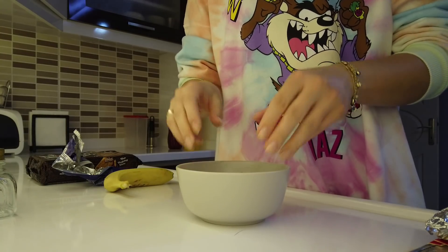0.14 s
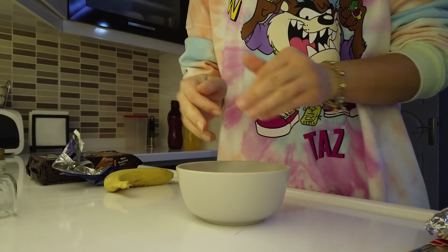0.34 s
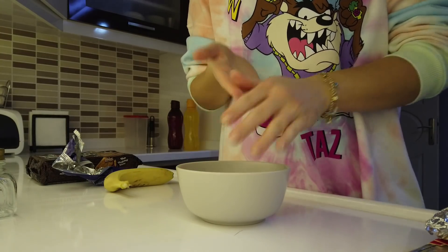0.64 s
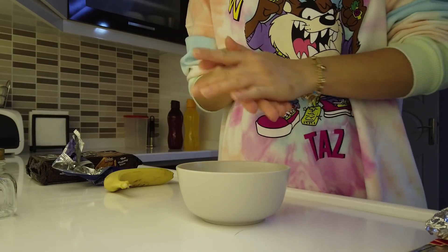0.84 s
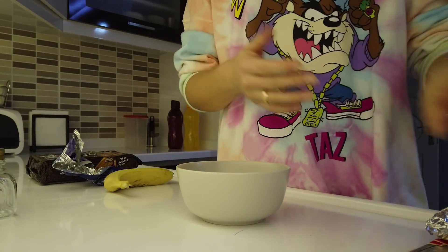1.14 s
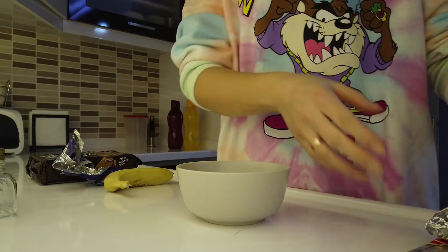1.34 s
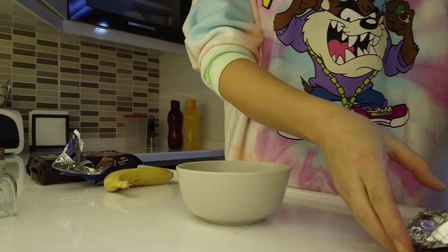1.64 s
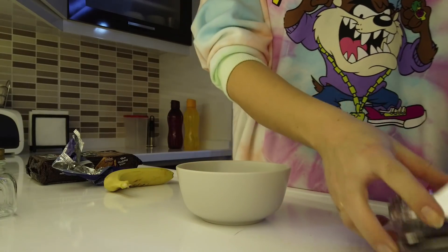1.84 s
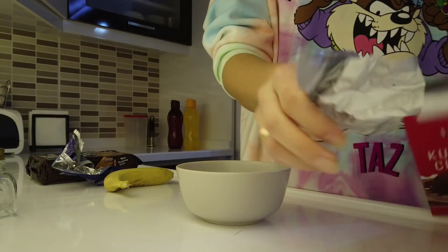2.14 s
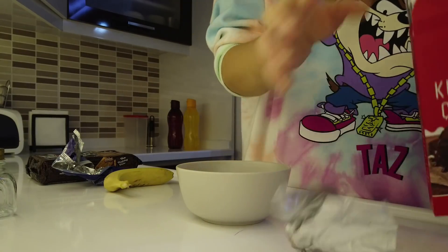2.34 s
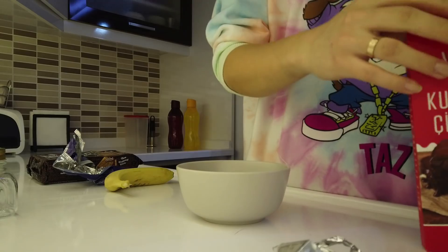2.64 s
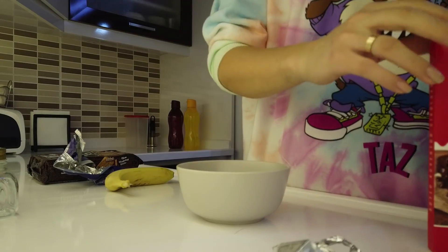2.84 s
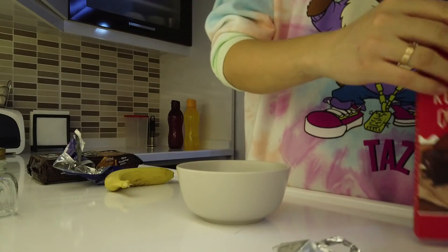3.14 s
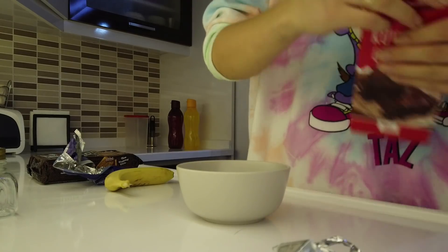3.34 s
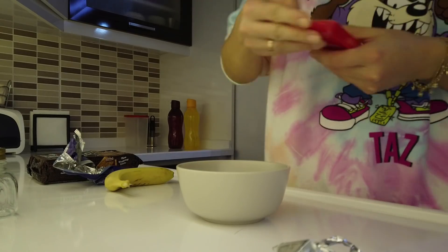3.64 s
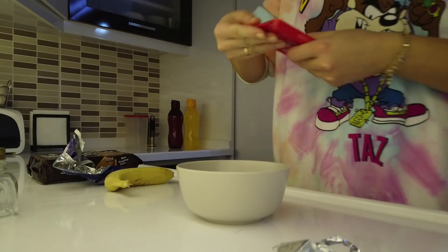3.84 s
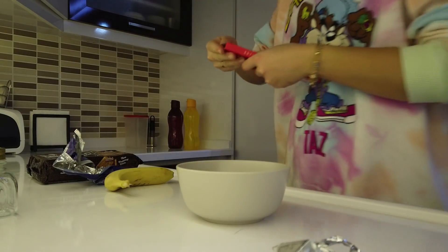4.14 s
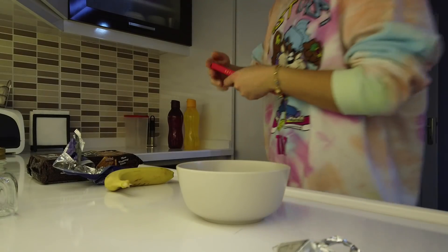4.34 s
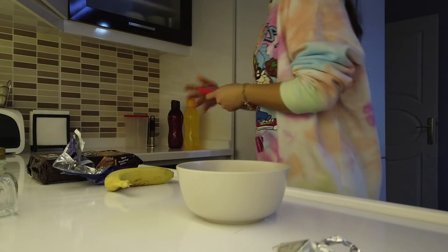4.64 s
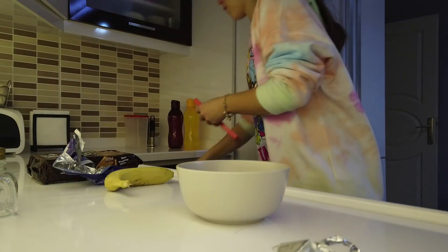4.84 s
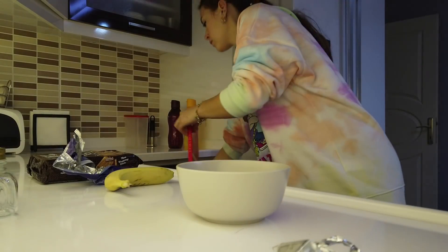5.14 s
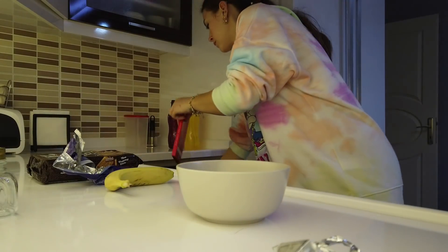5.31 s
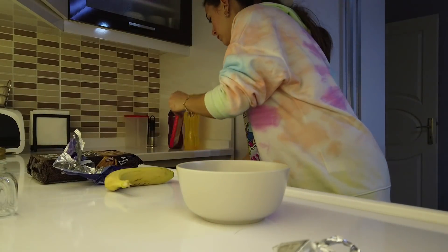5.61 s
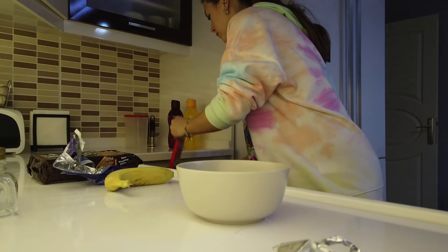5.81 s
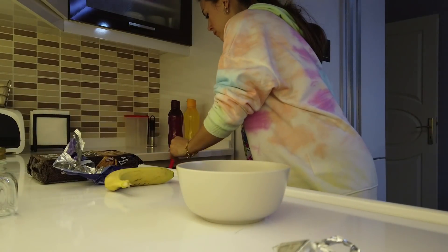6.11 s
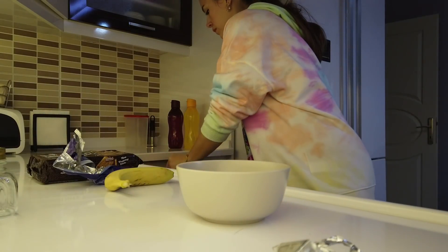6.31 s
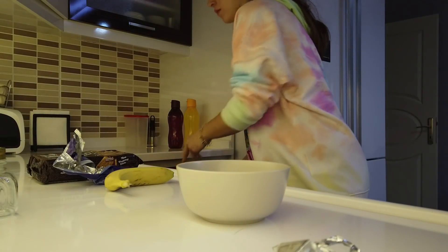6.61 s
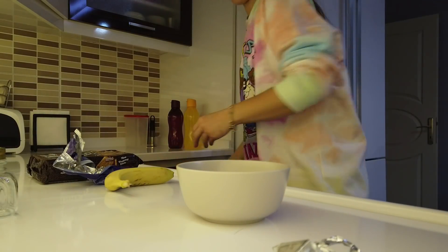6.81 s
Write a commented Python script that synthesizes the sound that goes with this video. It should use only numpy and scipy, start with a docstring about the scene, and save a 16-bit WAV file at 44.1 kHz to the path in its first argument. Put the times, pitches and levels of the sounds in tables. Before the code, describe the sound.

A small, quiet kitchen heard closely in stereo, with a faint wavering fridge hum, narrow hiss and short room echo throughout. At 0.13-0.3 s several chocolate pieces knock and clatter into a ceramic bowl, with hollow ringing and tiny bright clicks. Soft palm brushes follow, barely audible at 0.4, clearer at 0.7 and 1.0. Fingers tap the counter at 1.4; foil crackles crisply until about 2.2, with a tiny skin squeak at 1.6. Another sharp foil burst comes at 2.4-2.8, ending as a box knocks firmly on the counter at 2.8. From 3.0 to 4.8 the carton flexes and creases in small, dry pops. A drawer starts rolling around 5.1-5.4, rumbling with bumps at 5.8-5.9. A low drone glides at 6.0-6.2, then heavy wooden-sounding bumps at 6.5 and 6.7 close it, with rattling rollers and rustling packets.

```python
"""Pieces of chocolate drop into a ceramic bowl: knocks, clatter and ringing tones. Palms hiss past each other.
Foil is gathered up with ticks, snaps and squeaks; a box is stood on the counter and its carton folded shut.
A drawer then rolls open on noisy rollers, drones as it glides, and bumps closed on rustling packets.
All along a fridge hums and hisses in the small room, whose echo follows the other sounds."""
import sys
import numpy as np
from scipy import signal
from scipy.fft import rfft, irfft, next_fast_len
from scipy.io import wavfile
from scipy.ndimage import uniform_filter1d

SR = 44100
rng = np.random.default_rng(int(sys.argv[2]) if len(sys.argv) > 2 else 0)


def output_pcm(signal):
    """Save a mono or channel-first signal as 16-bit PCM at the path in sys.argv[1].

    Samples are clipped to [-1, 1] before scaling.
    """
    pcm = np.clip(np.atleast_2d(signal).T, -1, 1) * 32767
    wavfile.write(sys.argv[1], SR, np.round(pcm).astype(np.int16))


N = 307377
TIME = np.arange(N) / SR  # seconds

# Levels in the tables are relative: the functions may trim them further.
# Fridge and room air: colour of the noise [f/Hz, level/dB]
AIR_COLOUR = [(20, -7), (36, -2.5), (48, 13), (64, -21), (82, -12), (130, -2.5), (165, -7.5), (260, -13),
              (370, -2.5), (500, -18), (630, -10), (800, -19), (2200, -17), (2900, -16.5), (3800, -17.5),
              (7000, -31), (10500, -28), (16000, -53)]
AIR_DB = -56
# Steady tones of the fridge [f/Hz, level/dB]
FRIDGE_HUM = [(48.4, -64), (134.6, -64.5), (188.4, -60), (296.1, -81.5), (376.8, -69), (597.5, -72.5)]
# Narrow hiss of the fridge: colour [f/Hz, level/dB]
HISS_COLOUR = [(2300, -39), (2700, 5.5), (2880, 12.5), (3100, 8.5), (3700, -24)]
HISS_DB = -61.5
# How long the room's echo takes to fall 60 dB [f/Hz, fall time/s]
ROOM_FALL = [(100, 0.77), (260, 0.68), (700, 0.6), (2000, 0.47), (7000, 0.37), (14000, 0.31)]
# How much spread-out sound differs between left and right [f/Hz, side level/dB]
STEREO_WIDTH = [(60, -22.5), (130, -45), (250, -34.5), (600, -25), (1300, -20), (2600, -14.5), (5000, -7),
                (14000, -4)]

# Drawer starting, reaching its stop and closing [t/s, knock level/dB, knock f/Hz, body level/dB]
DRAWER_KNOCKS = [(5.364, -27, 350, -41), (5.815, -18, 73, -33.5), (5.893, -23, 116, -40.5),
                 (6.4985, -10, 219, -21), (6.5075, -10.5, 211, -18), (6.530, -14.5, 111, -27),
                 (6.577, -44, 201, -31.5), (6.676, -12, 400, -32), (6.690, -13, 200, -21.5),
                 (6.706, -17, 295, -30), (6.745, -29, 336, -32.5)]
# Tones the drawer rings with [f/Hz, level/dB, time to fall 60 dB/s]
DRAWER_TONES = [(95.6, -7.5, 0.73), (130.5, -1, 0.49), (190, 8.5, 0.83), (219.5, 1, 0.33), (372, -2, 0.18),
                (401.4, 3, 0.26), (460, 7, 0.12), (1129, -2, 0.22)]
# Colour of the drawer's many short, crowded tones [f/Hz, level/dB]
DRAWER_CLATTER_COLOUR = [(30, -35.5), (100, 10.5), (400, 7.5), (700, -1.5), (1300, -9.5), (2400, -9.5),
                         (4500, -25), (10000, -54), (16000, -46)]
# Pushes of the drawer [start t/s, held t/s, panel rumble level/dB, roller noise level/dB]
DRAWER_PUSHES = [(5.10, 0.045, -50.5, -60.5), (5.36, 0.25, -43, -45), (5.63, 0.21, -44.5, -41.5),
                 (5.88, 0.093, -47.5, -53.5), (6.0, 0.2, -54.5, -66.5), (6.52, 0.21, -38, -32.5),
                 (6.80, .13, -40.5, -50.5)]
# Colour of the shaking panels [f/Hz, level/dB]
RUMBLE_COLOUR = [(30, -4), (60, -3), (110, 14.5), (170, 1), (260, 5), (400, 3), (550, -6), (900, -20),
                 (2000, -56.5)]
# Colour of the rollers [f/Hz, level/dB]
ROLLER_COLOUR = [(300, -24.5), (650, 8.5), (1050, 4.5), (1400, 0), (2300, -9.5), (4000, -22.5),
                 (8000, -46.5)]
# Drawer front droning as it glides [start t/s, held t/s, level/dB]
DRONE_GLIDE = [(6.01, 0.15, -37.5)]
# Tones in the drone [multiple of its pitch, level/dB]
DRONE_TONES = [(1, 1), (1.64, -15)]
DRONE_HZ, DRONE_SAG_HZ_PER_S = 220, 13  # it sinks as the drawer slows

# Fingers, then the box, meeting the counter [t/s, knock level/dB, knock f/Hz, body level/dB]
COUNTER_KNOCKS = [(1.4183, -25.5, 401, -37), (1.527, -31, 172.6, -53), (2.8152, -10.5, 409, -10),
                  (2.8345, -18, 270, -21), (2.8580, -20, 503, -26), (4.016, -38, 405, -48),
                  (4.436, -35, 358, -44)]
# Tones the counter rings with [f/Hz, level/dB, time to fall 60 dB/s]
COUNTER_TONES = [(90.5, 0.5, 0.15), (131, 1.5, 0.3), (147, -2.5, 0.1), (182.5, -9, 0.53), (215, -16, 0.26),
                 (270, -9, 0.089), (310, -11, 0.19), (352.4, -2.5, 0.48), (460, 5, 0.23), (491, -11, 0.43),
                 (608, -4, 0.14), (730, -17, 0.14), (827, -8, 0.13)]
# Colour of the counter's many short, crowded tones [f/Hz, level/dB]
COUNTER_CLATTER_COLOUR = [(30, -34), (120, 2), (280, 3), (500, 1.5), (800, -4.5), (1300, -16), (2500, -21),
                          (5000, -32), (10000, -56), (16000, -45)]
# Hand and box dragging over the counter [start t/s, held t/s, level/dB]
COUNTER_DRAGS = [(1.54, 0.2, -38), (2.60, .17, -42.5)]
# Colour of the dragging [f/Hz, level/dB]
DRAG_NOISE_COLOUR = [(40, -33), (90, 2.5), (170, -2.5), (300, -11), (600, -19.5), (1200, -22.5)]

# Packets shifting in the drawer [start t/s, held t/s, flexing level/dB, fine crease level/dB]
PACKET_SHIFTS = [(5.69, .03, -60, -67), (5.795, 0.022, -58, -59), (6.498, 0.061, -43.5, -43),
                 (6.615, 0.088, -40.5, -41), (6.805, 0.034, -50, -52.5)]
# Folds of the carton [start t/s, held t/s, card flexing level/dB, fine crease level/dB]
CARTON_FOLDS = [(3.06, 0.012, -48.5, -52.5), (3.14, 0.087, -46.5, -49), (3.35, 0.12, -57.5, -64.5),
                (3.45, 0.04, -57.5, -55.5), (3.585, .12, -51, -56.5), (3.77, 0.12, -55.5, -59),
                (3.975, 0.028, -38, -50), (4.11, 0.15, -51, -67.5), (4.335, 0.1, -48, -54),
                (4.55, 0.028, -57, -63), (4.76, .08, -80, -66.5)]
# Squeezes of the foil [start t/s, held t/s, sheet flexing level/dB, fine crease level/dB]
FOIL_SQUEEZES = [(1.416, .03, -39.5, -54), (1.562, 0.21, -38, -34), (1.605, 0.012, -30, -71),
                 (1.825, 0.25, -36, -38), (1.975, 0.27, -37.5, -31.5), (2.43, 0.0086, -58, -31.5),
                 (2.55, 0.28, -32.5, -34)]
# Colour of flexing card [f/Hz, level/dB]
CARD_FLEX_COLOUR = [(200, 8), (800, -9), (1100, -6.5), (1500, 0.5), (2000, -4.5), (2700, 0), (4000, -7.5),
                    (6000, -17), (9000, -43)]
# Colour of flexing foil [f/Hz, level/dB]
FOIL_FLEX_COLOUR = [(100, -2), (500, -4), (800, -7), (1200, 3), (1600, -4.5), (2600, 1.5), (4200, -6.5),
                    (6000, -21), (9000, -46)]
# Colour of the fine creases [f/Hz, level/dB]
CREASE_COLOUR = [(2500, -6.5), (5000, 2.5), (7000, 0), (8800, 3.5), (9500, 3.5), (10500, 6), (11500, -2.5),
                 (13500, -4.5), (16000, -11)]
# Loudest buckles of foil and card [t/s, snap level/dB, f/Hz, crackle level/dB]
LOUD_SNAPS = [(1.4175, -23, 1190, -29), (1.5640, -31, 3150, -31), (1.8230, -29, 2250, -24),
              (1.9640, -15, 2640, -27), (2.0350, -19.5, 3730, -46), (2.196, -28, 1400, -49),
              (2.427, -68, 2000, -18.5), (2.4366, -16, 3850, -26.5), (2.799, -16.5, 2060, -18.5),
              (2.817, -14, 2400, -13.5), (3.147, -34, 2260, -39), (3.159, -24.5, 2400, -40),
              (3.6419, -27, 1750, -48), (3.665, -30, 2150, -57), (3.702, -33.5, 1730, -59),
              (3.9826, -43, 3000, -51), (3.9950, -25, 3000, -45), (4.013, -27, 1760, -28),
              (4.0780, -29, 2480, -50), (4.3457, -29.5, 1580, -28), (4.4346, -23, 1520, -38),
              (6.6270, -30, 1670, -20), (6.7010, -15.5, 1820, -31)]
# Colour of the crackle around a snap [f/Hz, level/dB]
CRACKLE_COLOUR = [(500, -31), (1200, 8), (3000, 6), (6000, -1), (10500, 0), (12000, -8.5), (16000, -8.5)]
SNAP_CYCLES = 22.6  # a snapping facet falls 60 dB in this many cycles
# Fingertips squeaking under the foil [middle t/s, half length t/s, start f/Hz, end f/Hz, level/dB]
FINGER_SQUEAKS = [(1.616, 0.0038, 942, 1214, -18), (1.632, 0.0036, 1800, 2010, -22.5)]
# One palm sweeping over the other [middle t/s, level/dB]
PALM_SWEEPS = [(.41, -65.5), (.70, -47), (1.001, -44)]
# Colour of the palms [f/Hz, level/dB]
PALM_COLOUR = [(500, 0.5), (1500, -15.5), (3500, 0.5), (6000, -2), (10000, 5), (12000, 4), (16000, -1.5)]
BRUSH_HALF_S = 0.056  # from the middle of a sweep until it has fallen to 1/e

# Chocolate landing in the bowl [t/s, knock level/dB, knock f/Hz, body level/dB]
BOWL_KNOCKS = [(.1335, -19, 920, -30), (.1862, -15.5, 1300, -22.5), (.2297, -9.5, 1150, -18),
               (.2440, -27, 169.4, -31), (.2850, -10, 1010, -26.5), (.2940, -13.5, 1030, -40)]
# Tones the bowl rings with [f/Hz, level/dB, time to fall 60 dB/s]
BOWL_TONES = [(166.5, -4.5, 0.63), (437, -5.5, 0.55), (726, -6.5, 0.82), (884, -1, 0.16), (1010, -22, .3),
              (1132, -5.5, 0.4), (1378, -1, 0.12), (1570, -7, 0.077), (2598, -1.5, 0.45),
              (6820, -22.5, .27), (9800, -26, 0.22)]
# Colour of the bowl's many short, crowded tones [f/Hz, level/dB]
BOWL_CLATTER_COLOUR = [(40, -13), (100, -1), (300, -3.5), (520, -7.5), (1100, -1), (1700, -9),
                       (2400, -19.5), (3400, -39), (4700, -43), (8000, -53), (16000, -54)]
# Hard edges of chocolate clicking on the glaze [t/s, level/dB]
EDGE_CLICKS = [(0.1847, -48), (0.21, -48), (0.229, -36), (.2660, -64), (0.284, -51)]
# Colour of those clicks [f/Hz, level/dB]
GLAZE_COLOUR = [(1500, 2), (2400, -8), (3400, 5), (4700, 10), (5800, -8), (7000, 2), (8200, -8),
                (9500, -18), (16000, -30)]
# The small pieces' own ring [f/Hz, level/dB, time to fall 60 dB/s]
PIECE_TONES = [(4560, -10, .12), (4790, -9, .1), (5050, -13, .09), (8230, -18, .16)]

CLATTER_BUILD_S = 0.0033  # a blow spreads through the body in this time
LIMIT_DB, RECOVERY_DB_PER_S = -16.5, 6  # gain drops above this level, then creeps back
CUTOFF_HZ = 16000


def from_db(db):
    """Turn decibels into a plain multiplier."""
    return 10 ** (np.asarray(db) / 20)


def rms_one(x):
    """Scale a signal to an average strength (rms) of 1."""
    return x / np.sqrt(np.mean(x ** 2) + 1e-20)


def at_hz(points, hz):
    """Read a table between its rows, with frequency on a log scale as in hearing."""
    known, values = np.transpose(points)
    return np.interp(np.log(np.maximum(hz, 1)), np.log(known), values)


def level(rows, attack_s, slope_db_per_s, release_s, column=2):
    """Loudness of gestures: each rises, swells or sags while held, then falls 60 dB over the release."""
    gain = np.zeros(N)
    for row in rows:
        age, held = TIME - row[0], row[1]
        swell_db = slope_db_per_s * np.clip(age, 0, held)
        fall_db = 60 * np.clip((age - held) / release_s, 0, 2)
        gain += np.clip(age / attack_s, 0, 1) * from_db(row[column] + swell_db - fall_db)
    return gain


def drift(rate):
    """Smooth random wandering with spread 1, heading for a new value `rate` times a second."""
    knots = rng.standard_normal(8192)
    return rms_one(np.interp(TIME * rate, np.arange(len(knots)), knots))


def coloured(x, spectrum, size=8192):
    """Filter with no sound ahead of its input (minimum phase), keeping the power of white noise."""
    cepstrum = irfft(np.log(from_db(at_hz(spectrum, np.fft.rfftfreq(size, 1 / SR)))))
    # folding the second half onto the first puts the response after its input
    cepstrum[1:size // 2] *= 2
    cepstrum[size // 2 + 1:] = 0
    response = irfft(np.exp(rfft(cepstrum)))
    return signal.oaconvolve(x, response / np.linalg.norm(response))[:len(x)]


def spread(mid, side):
    """Two close microphones hear the same bass and different treble."""
    size = next_fast_len(2 * len(side))
    width = from_db(at_hz(STEREO_WIDTH, np.fft.rfftfreq(size, 1 / SR)))
    side = irfft(rfft(side, size) * width, size)[:len(mid)]
    return np.array([mid + side, mid - side])


def add(track, s, sound):
    """Mix a sound into a track at a time in seconds."""
    start = round(s * SR)
    track[start:start + len(sound)] += sound[:N - start]


def dying(t60):
    """A fade that falls 60 dB in t60 seconds, cut off after 0.7 s."""
    return from_db(-60 * TIME[:SR * 7 // 10] / t60)


def ring(hz, t60):
    """One struck tone dying away."""
    decay = dying(t60)
    return decay * np.sin(2 * np.pi * hz * TIME[:len(decay)])


def burst(t60):
    """Many crowded tones dying together, made from fading noise."""
    decay = dying(t60)
    return decay * rng.standard_normal(len(decay))


def grains(per_s, size_db, clump_db, clump_rate):
    """Tiny slips of uneven size that come in clumps; their slow level is evened."""
    signs = rng.choice([-1, 1], N)
    sizes = from_db(size_db * np.minimum(rng.exponential(1, N), 4)) * signs
    happens = rng.random(N) < per_s / SR
    clicks = sizes * happens * from_db(clump_db * drift(clump_rate))
    return clicks / np.sqrt(np.abs(uniform_filter1d(clicks ** 2, size=2048)) + 1e-4)


def fridge():
    """A fridge gives a wavering hum and a narrow hiss, heard with the air of the room."""
    air = []
    for air_noise, hiss_noise in rng.standard_normal((2, 2, N)):
        hiss = from_db(HISS_DB) * coloured(hiss_noise, HISS_COLOUR)
        air.append(from_db(AIR_DB) * coloured(air_noise, AIR_COLOUR) + hiss)
    hum = np.zeros(N)
    for hz, db in FRIDGE_HUM:
        strength = from_db(db + 2.05 * drift(3.44)) * np.sqrt(2)
        hum += strength * np.sin(2 * np.pi * hz * TIME + .5 * drift(4))
    return spread(air[0], from_db(6.5) * air[1]) + hum


def kitchen_echo(build_s):
    """Echo of the tiled room, each octave dying at its own pace; total energy 1."""
    t = TIME[:32768]
    hz, white = np.fft.rfftfreq(len(t), 1 / SR), rfft(rng.standard_normal(len(t)))
    octave = np.round(np.log2(np.clip(hz, 64, 16384)))
    tail = np.zeros(len(t))
    for k in np.unique(octave):
        tail += irfft(white * (octave == k)) * from_db(-60 * t / at_hz(ROOM_FALL, 2 ** k))
    tail *= 1 - np.exp(-t / build_s)
    return tail / np.linalg.norm(tail)


def in_kitchen(x, wet_db, near_db):
    """Direct sound, quick sideways reflections off counter and wall, and the room's echo."""
    near = burst(.09) * (1 - dying(.02))
    mid = from_db(wet_db) * kitchen_echo(build_s=0.00043)
    side = from_db(wet_db) * kitchen_echo(build_s=0.0013)
    side[:len(near)] += from_db(near_db) * near / np.linalg.norm(near)
    return x + signal.oaconvolve(x[None], spread(mid, side), axes=1)[:, :N]


def blows(rows, modes, clatter_colour, clatter_t60, soft_hz, cycles, ring_db, damped_db):
    """A blow gives a short knock, a clatter of crowded tones and the body's ring, damped after the first."""
    body = 0
    for k, (hz, db, t60) in enumerate(modes):
        body = body + from_db(db) * ring(hz, t60) * (-1) ** k
    # a yielding contact rounds the start of the knock
    softener = signal.butter(2, soft_hz, fs=SR, output="sos")
    tones, clatter = np.zeros((2, N))
    for k, (s, knock_db, hz, body_db) in enumerate(rows):
        knock = signal.sosfilt(softener, ring(hz, cycles / hz))
        body_gain = from_db(body_db + ring_db + damped_db * (k > 0))
        add(tones, s, from_db(knock_db) * knock + body_gain * body)
        add(clatter, s, from_db(body_db) * burst(clatter_t60) * (1 - dying(CLATTER_BUILD_S)))
    return tones + coloured(clatter, clatter_colour)


def drawer_roll(rumble_db, roller_db, attack_s, swell_db_per_s, release_s):
    """Rollers run over small bumps and shake the panels, louder as each push gathers speed."""
    rumble = coloured(grains(1500, 1.3, clump_db=-2.0, clump_rate=75), RUMBLE_COLOUR)
    rumble *= level(DRAWER_PUSHES, attack_s, swell_db_per_s, release_s, column=2)
    rollers = coloured(grains(7000, 0.92, clump_db=-0.5, clump_rate=130), ROLLER_COLOUR)
    rollers *= level(DRAWER_PUSHES, attack_s, swell_db_per_s, release_s, column=3)
    return from_db(rumble_db) * rumble + from_db(roller_db) * rollers


def drawer_drone():
    """On the slow glide the runners make the front panel drone."""
    sag_hz = DRONE_SAG_HZ_PER_S * (TIME - DRONE_GLIDE[0][0])
    waver_hz = 2.5 * drift(50)
    phase = 2 * np.pi * np.cumsum(DRONE_HZ - sag_hz + waver_hz) / SR
    drone = sum(from_db(db) * np.sin(ratio * phase) for ratio, db in DRONE_TONES)
    loudness = level(DRONE_GLIDE, attack_s=0.023, slope_db_per_s=25, release_s=0.48)
    return drone * loudness * from_db(drift(65))


def drawer():
    """The drawer knocks as it starts, stops and closes, and rolls in between."""
    knocks = blows(DRAWER_KNOCKS, DRAWER_TONES, DRAWER_CLATTER_COLOUR, clatter_t60=0.27,
                   soft_hz=545, cycles=12.7, ring_db=-6.5, damped_db=-6)
    return knocks + drawer_roll(rumble_db=1.5, roller_db=-5, attack_s=0.0051,
                                swell_db_per_s=20, release_s=0.5)


def counter():
    """Fingers and box knock on the counter, and rub a dull noise out of it when dragged."""
    knocks = blows(COUNTER_KNOCKS, COUNTER_TONES, COUNTER_CLATTER_COLOUR, clatter_t60=0.17,
                   soft_hz=1300, cycles=34, ring_db=-5, damped_db=-2)
    loudness = level(COUNTER_DRAGS, attack_s=0.019, slope_db_per_s=-27, release_s=0.22)
    return knocks + loudness * coloured(rng.standard_normal(N), DRAG_NOISE_COLOUR)


def facets(clicks, cycles, count=16):
    """Each slip rings one facet of the sheet, small or large, for a few cycles."""
    dealt, out = rng.integers(0, count, N), np.zeros(N)
    for k, hz in enumerate(np.geomspace(700, 7000, count)):
        # r sets how fast the facet dies, w its pitch
        r, w = from_db(-60 * hz / (cycles * SR)), 2 * np.pi * hz / SR
        own_clicks = clicks * (dealt == k) + 1e-18
        out += signal.lfilter([1 - r, 0, r - 1], [1, -2 * r * np.cos(w), r * r], own_clicks)
    return out


def crumple(gestures, flex_colour, per_s, size_db, cycles, flex_db, crease_db, attack_s,
            flex_slope_db, crease_slope_db, release_s):
    """Facets flex while fine creases tick above them; each swells or eases (dB/s) during a squeeze."""
    slips = grains(per_s, size_db, clump_db=2.0, clump_rate=90)
    flex = rms_one(coloured(facets(slips, cycles), flex_colour))
    creases = coloured(grains(per_s * 2.6, size_db, clump_db=2.0, clump_rate=110), CREASE_COLOUR)
    flex *= level(gestures, attack_s, flex_slope_db, release_s, column=2)
    creases *= level(gestures, attack_s, crease_slope_db, release_s, column=3)
    return from_db(flex_db) * flex + from_db(crease_db) * creases


def packets():
    """Packets in the drawer flex and crease as they shift."""
    return crumple(PACKET_SHIFTS, CARD_FLEX_COLOUR, per_s=1500, size_db=-0.5, cycles=36, flex_db=1.5,
                   crease_db=2, attack_s=0.01, flex_slope_db=1, crease_slope_db=-43, release_s=0.59)


def carton():
    """Card flexes and creases as the carton is folded shut."""
    return crumple(CARTON_FOLDS, CARD_FLEX_COLOUR, per_s=1800, size_db=2.2, cycles=30, flex_db=-2.0,
                   crease_db=-0.5, attack_s=0.012, flex_slope_db=13, crease_slope_db=3, release_s=0.48)


def foil():
    """Thin foil flexes and creases as it is squeezed together."""
    return crumple(FOIL_SQUEEZES, FOIL_FLEX_COLOUR, per_s=1600, size_db=2.0, cycles=22.0, flex_db=-6.0,
                   crease_db=-3, attack_s=0.0073, flex_slope_db=-4, crease_slope_db=-16.5, release_s=0.26)


def snaps(crackle_t60, overtone_db, build_s, crack_db, crack_t60):
    """A facet flips over with a crack, rings on three tones and sprays crackle that builds and dies."""
    pops, spray = np.zeros((2, N))
    for s, snap_db, hz, crackle_db in LOUD_SNAPS:
        t60 = SNAP_CYCLES / hz
        neighbours = ring(hz * 0.69, t60) + ring(hz * 1.45, t60)
        add(pops, s, from_db(snap_db) * (ring(hz, t60) - from_db(overtone_db) * neighbours))
        # the crackle starts to build just before the crack
        crackle = burst(crackle_t60) * (1 - dying(7 * build_s)) ** 2
        add(spray, s - build_s / 2, from_db(crackle_db) * crackle)
        add(spray, s, from_db(crackle_db + crack_db) * burst(crack_t60))
    return pops + coloured(spray, CRACKLE_COLOUR)


def squeaks():
    """Skin sticks and slips in short rising chirps."""
    out = np.zeros(N)
    for s, half, start_hz, end_hz, db in FINGER_SQUEAKS:
        hz = np.interp(TIME, [s - half, s + half], [start_hz, end_hz])
        loudness = from_db(db - 9.3 * ((TIME - s) / half) ** 2)
        out += loudness * np.sin(2 * np.pi * np.cumsum(hz) / SR)
    return out


def palms():
    """Skin hisses as the hands pass, loudest in the middle of each sweep."""
    sweeps = sum(from_db(db) * np.exp(-((TIME - s) / BRUSH_HALF_S) ** 2) for s, db in PALM_SWEEPS)
    return sweeps * coloured(rng.standard_normal(N), PALM_COLOUR)


def reshaped(x, swell_db, count=14):
    """As the sheet changes shape, its frequency bands swell and fade one by one."""
    size = next_fast_len(N)
    edges = np.geomspace(600, 17000, count + 1)
    band, spectrum = np.searchsorted(edges, np.fft.rfftfreq(size, 1 / SR)), rfft(x, size)
    gains = from_db(swell_db * np.array([drift(28) for k in range(count + 2)]))
    gains /= np.sqrt(np.mean(gains ** 2, axis=0))  # even out the bands' shared swell
    return sum(gain * irfft(spectrum * (band == k), size)[:N] for k, gain in enumerate(gains))


def hands():
    """Palms, foil, carton and packets with shifting tone, plus squeaks and snaps."""
    rustle = reshaped(palms() + foil() + carton() + packets(), swell_db=2.5)
    cracks = snaps(crackle_t60=0.036, overtone_db=-8, build_s=0.003, crack_db=-5.5, crack_t60=0.016)
    return rustle + squeaks() + cracks


def glaze_clicks(t60):
    """A bright scatter where a hard edge meets the glaze, and the piece's own short ring."""
    scatter, rings = np.zeros((2, N))
    for s, db in EDGE_CLICKS:
        add(scatter, s, from_db(db) * burst(t60))
        for hz, mode_db, mode_t60 in PIECE_TONES:
            add(rings, s, from_db(db + mode_db + rng.normal(0, 1.4)) * ring(hz, mode_t60))
    return coloured(scatter, GLAZE_COLOUR) + rings


def bowl():
    """Falling chocolate makes the ceramic bowl knock and ring, with clicks on its glaze."""
    knocks = blows(BOWL_KNOCKS, BOWL_TONES, BOWL_CLATTER_COLOUR, clatter_t60=0.15,
                   soft_hz=2400, cycles=20.3, ring_db=-0.5, damped_db=-35.5)
    return knocks + glaze_clicks(t60=0.034)


def scene():
    """Drawer, counter, hands and bowl sound in the kitchen over the fridge."""
    furniture = in_kitchen(counter() + drawer(), wet_db=-9.0, near_db=2.5) + drawer_drone()
    handling = in_kitchen(hands(), wet_db=-6.0, near_db=2.5)
    return fridge() + furniture + handling + in_kitchen(bowl(), wet_db=-7.5, near_db=6.5)


def record(dry):
    """The loudest knocks turn the gain down and it creeps back; the deepest bass and the top are cut."""
    dry = signal.sosfilt(signal.butter(2, 28, "high", fs=SR, output="sos"), dry)
    power = uniform_filter1d(np.mean(dry ** 2, axis=0), size=400)
    over_db = np.maximum(10 * np.log10(np.abs(power) + 1e-12) - LIMIT_DB, 0)
    # hold the largest cut so far, letting it shrink steadily
    recovered_db = RECOVERY_DB_PER_S * TIME
    cut_db = np.maximum.accumulate(over_db + recovered_db) - recovered_db
    dry = dry * from_db(-uniform_filter1d(cut_db, size=64))
    return signal.sosfilt(signal.ellip(10, .2, 80, CUTOFF_HZ, fs=SR, output="sos"), dry)


dry = scene()
out = record(dry)
output_pcm(out)
```